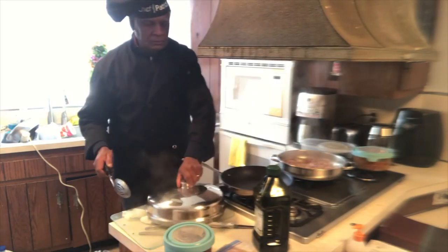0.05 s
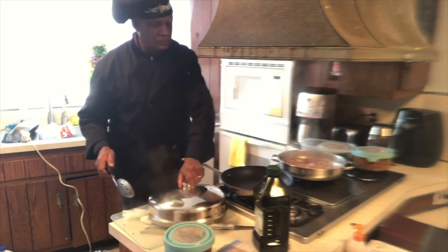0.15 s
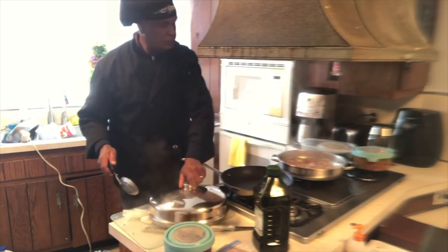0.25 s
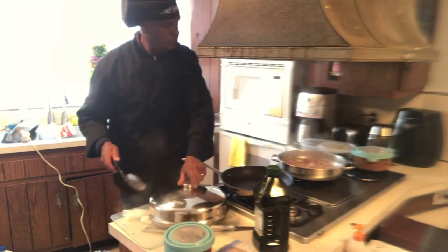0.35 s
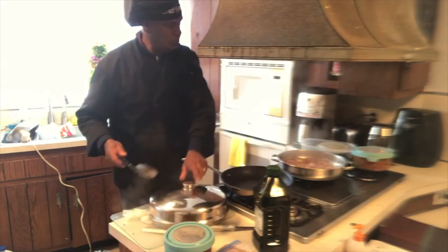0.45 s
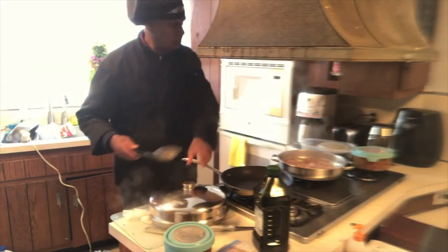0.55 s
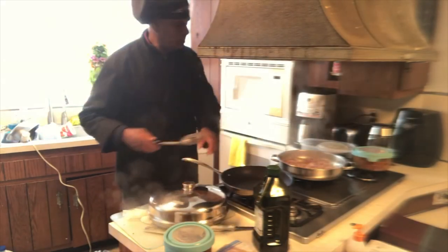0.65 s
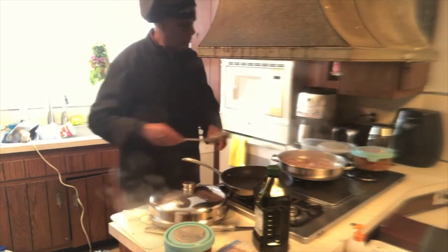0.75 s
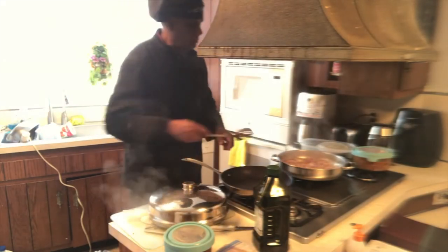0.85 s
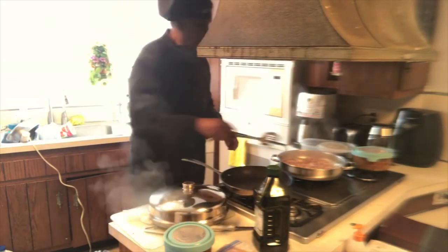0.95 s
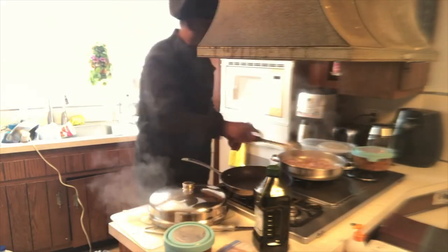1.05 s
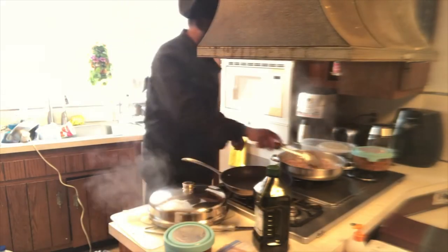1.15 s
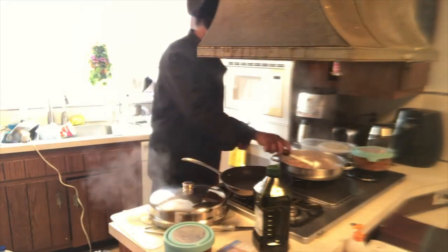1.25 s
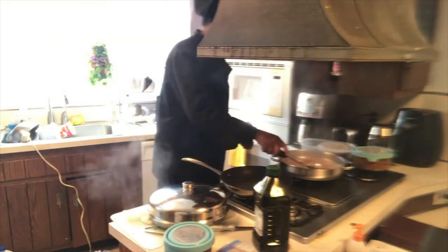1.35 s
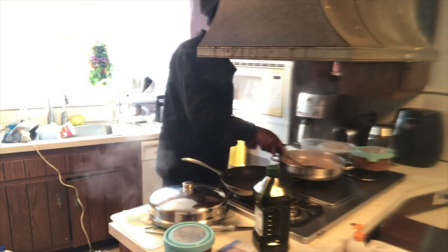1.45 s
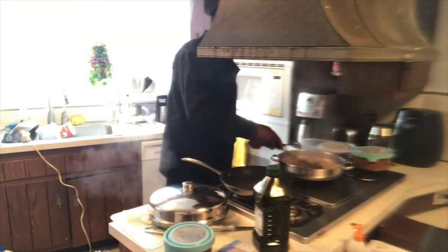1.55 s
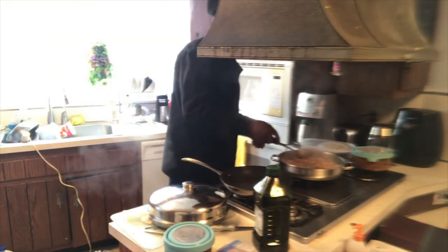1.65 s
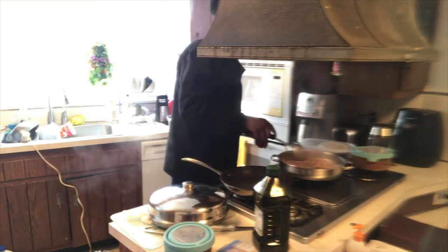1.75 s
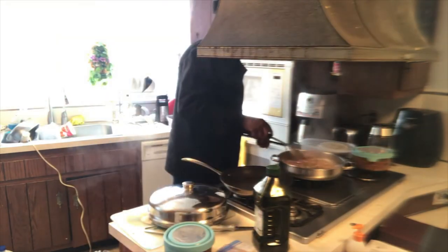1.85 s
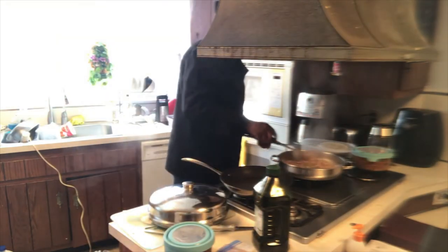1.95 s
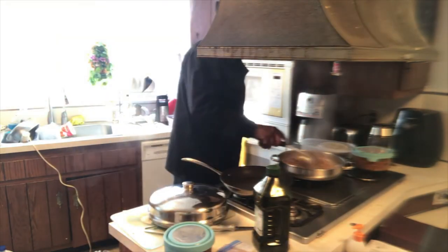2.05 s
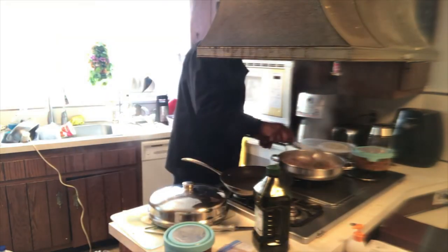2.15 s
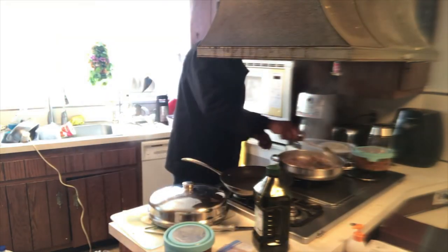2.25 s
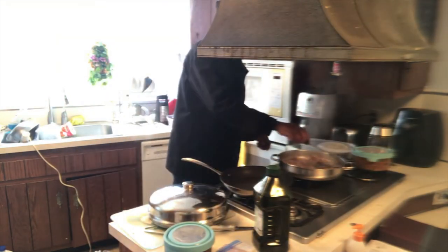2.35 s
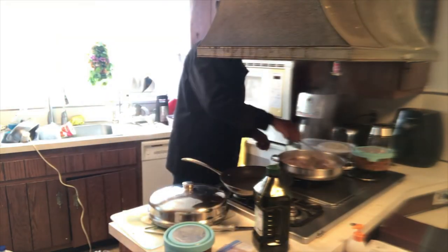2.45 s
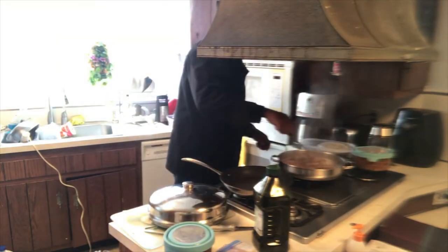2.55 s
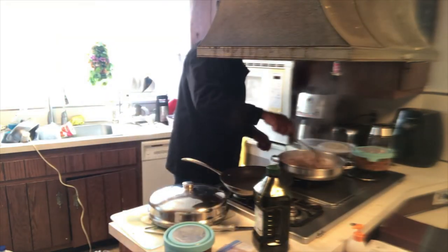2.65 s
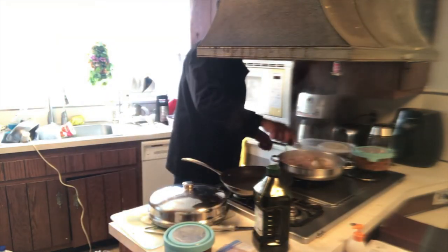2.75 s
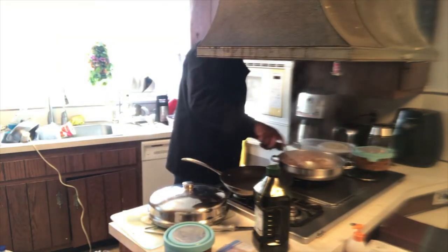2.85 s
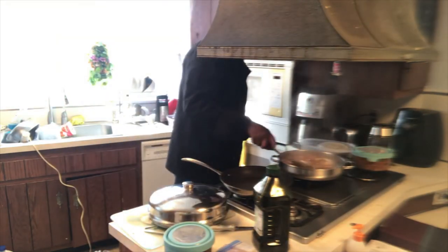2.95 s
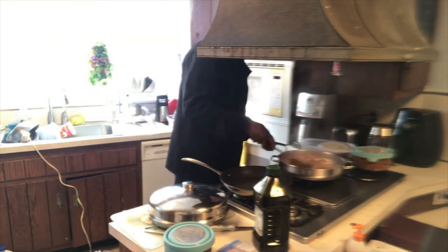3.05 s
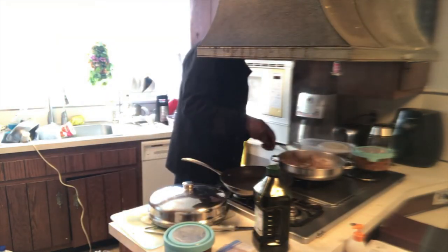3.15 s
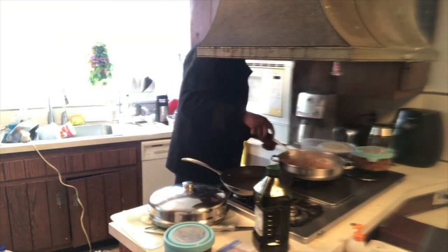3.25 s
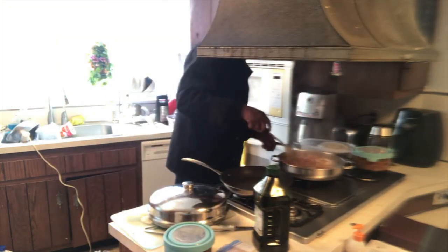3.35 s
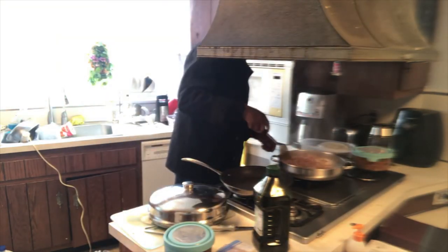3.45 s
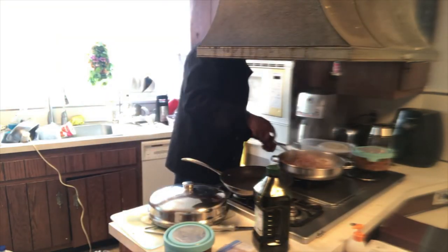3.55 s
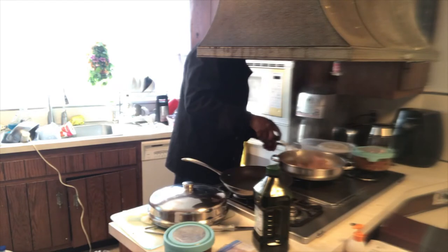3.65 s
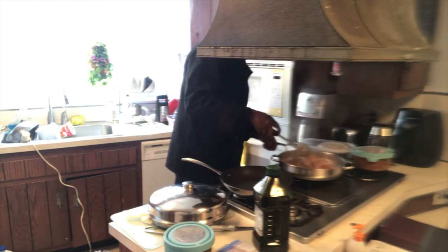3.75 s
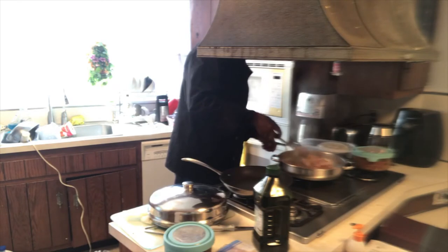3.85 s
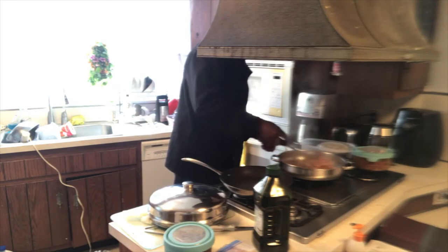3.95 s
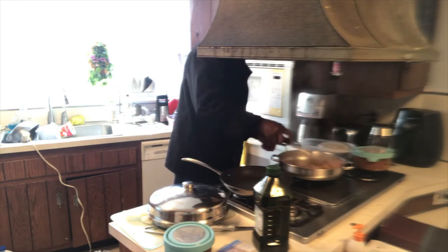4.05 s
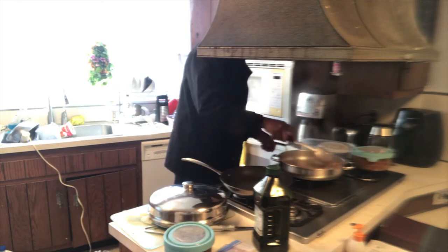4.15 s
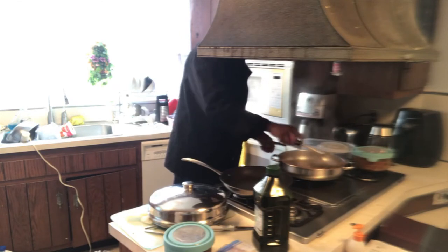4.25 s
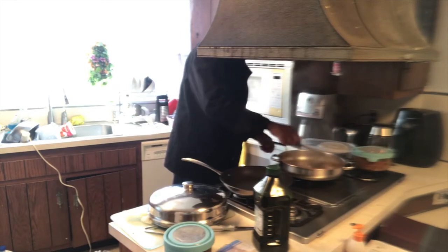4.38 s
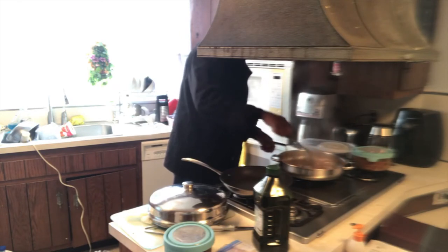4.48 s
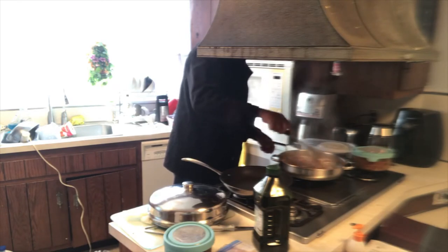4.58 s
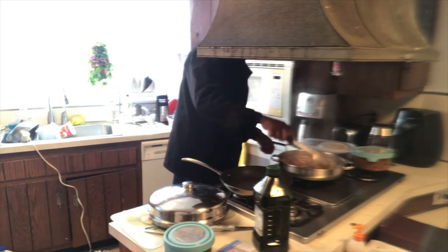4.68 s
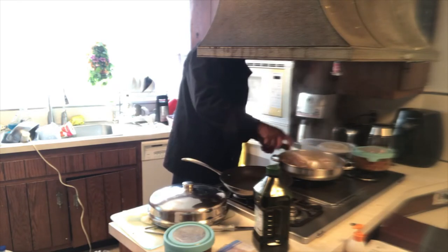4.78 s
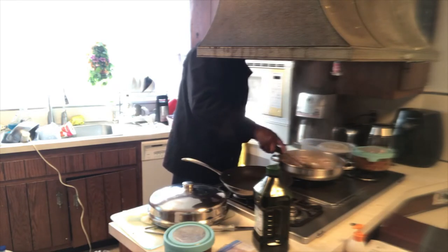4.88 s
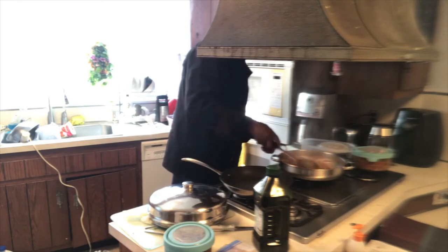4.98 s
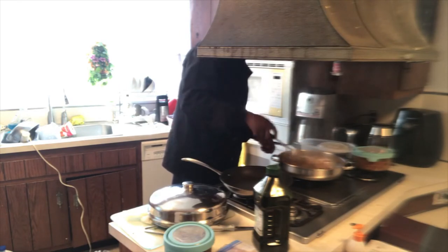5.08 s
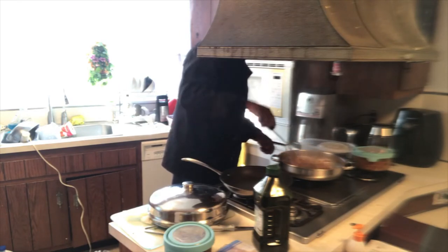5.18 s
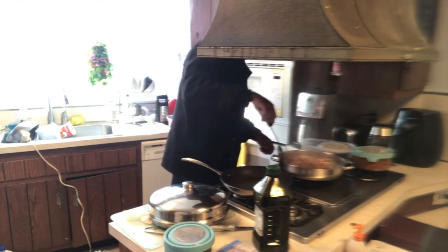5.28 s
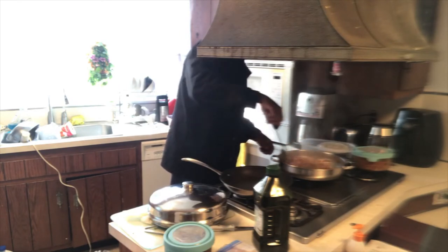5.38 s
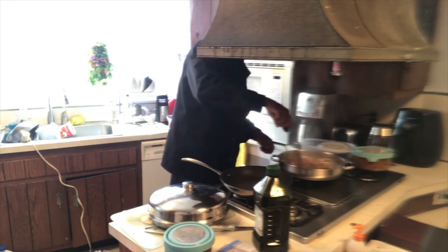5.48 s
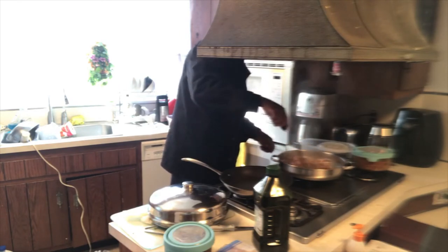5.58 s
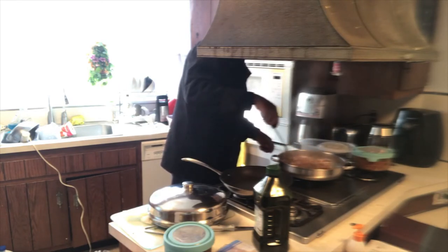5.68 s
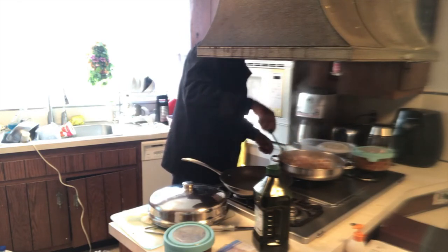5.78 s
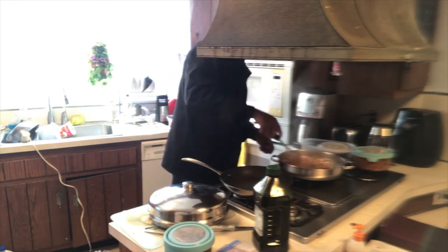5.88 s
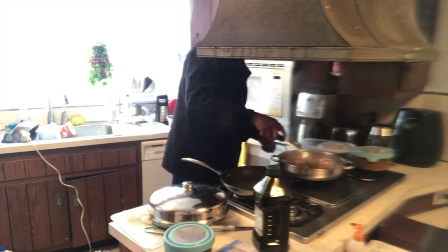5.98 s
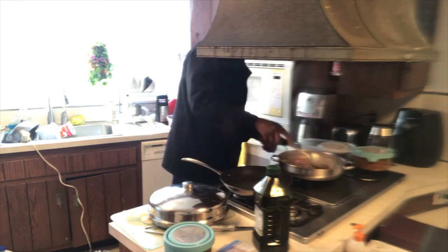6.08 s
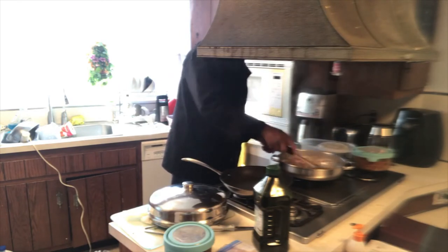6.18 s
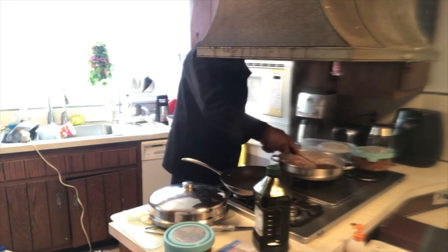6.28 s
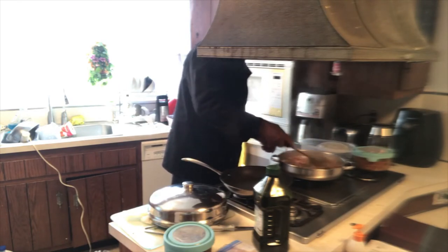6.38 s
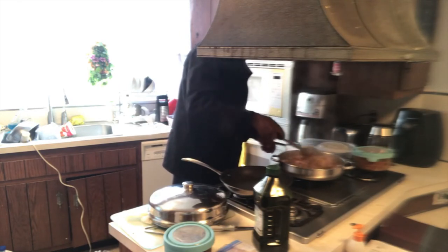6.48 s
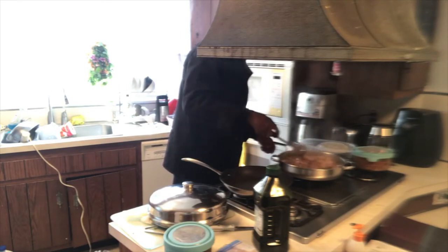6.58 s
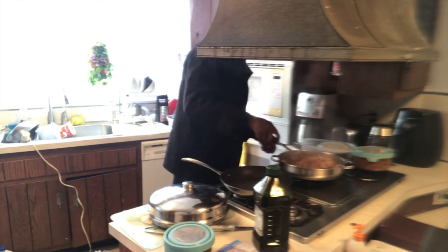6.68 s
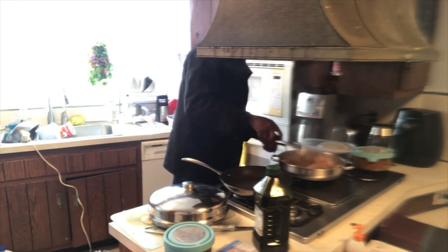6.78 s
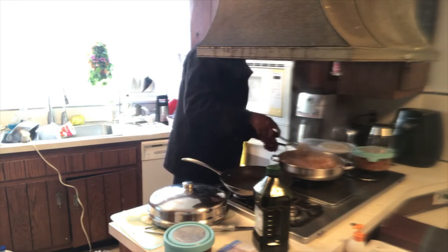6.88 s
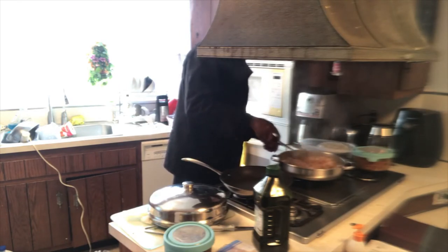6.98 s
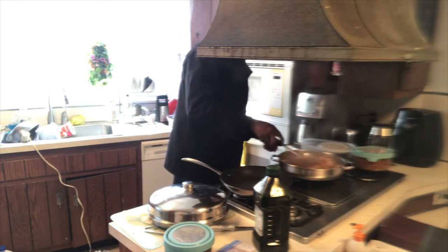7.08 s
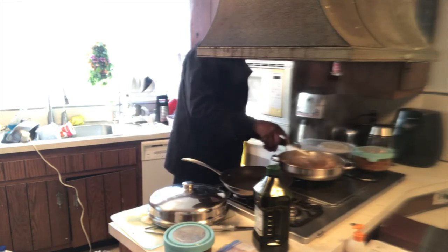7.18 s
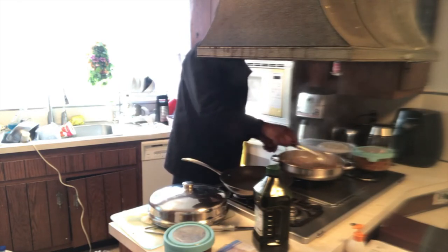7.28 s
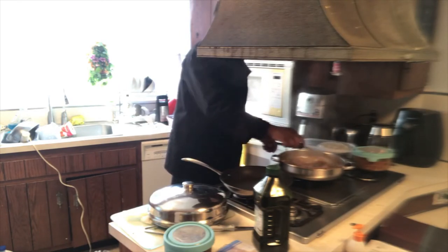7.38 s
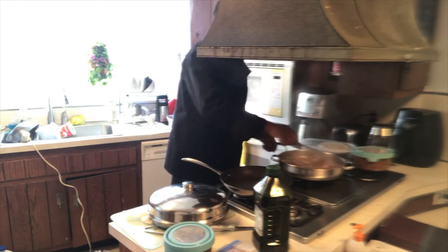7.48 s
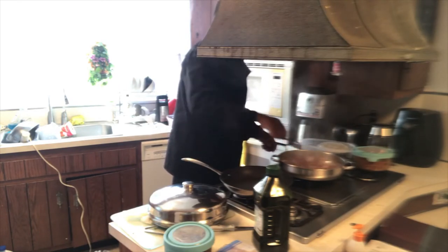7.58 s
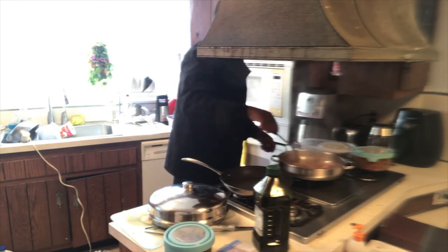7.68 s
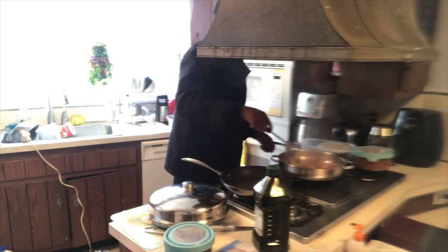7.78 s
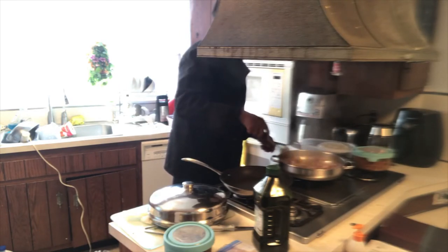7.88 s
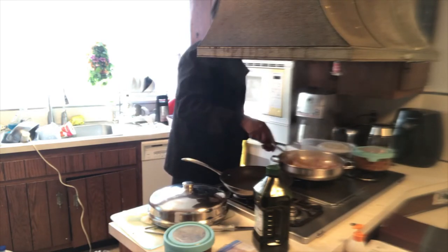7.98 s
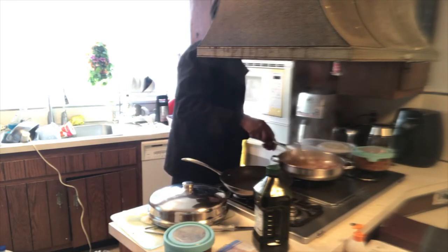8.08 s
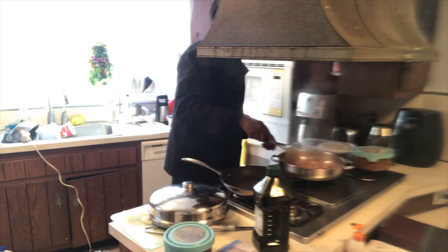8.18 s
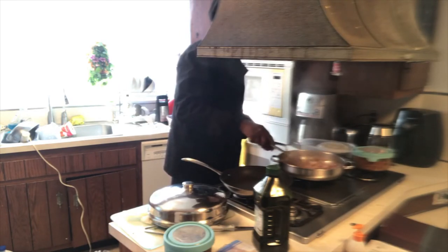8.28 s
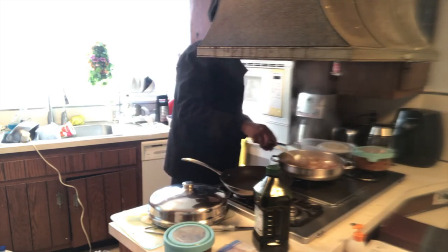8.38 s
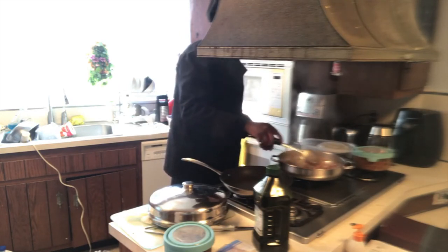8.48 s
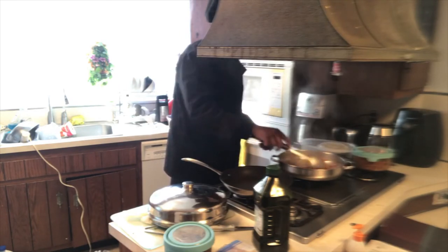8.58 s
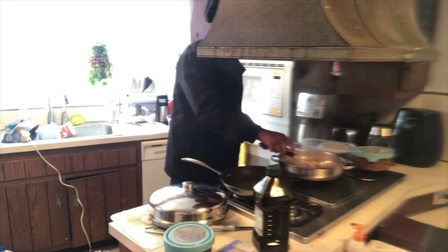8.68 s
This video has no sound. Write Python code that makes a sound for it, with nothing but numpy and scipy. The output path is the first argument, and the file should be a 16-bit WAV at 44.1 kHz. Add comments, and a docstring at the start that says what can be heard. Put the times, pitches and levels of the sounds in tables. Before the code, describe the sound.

Loud lid clatter opens, with a brief beating metallic ring, then a quiet bright scrape. After a second of light frying, a spoon knocks the pan, skids hollowly, clinks sharply several times and gives a short falling squeak. Frying hisses throughout, fuller in the second half, swelling with each scrape. Mono-like pickup in a small reflective kitchen with weak appliance hum.

```python
"""Spoon and lid over a frying pan

A steel lid rattles down onto a pot and scrapes into its seat; then a metal spoon knocks, skids and squeaks on a pan.
Each contact is a noise crack plus decaying modes in beating pairs, with dense reflections of a small hard kitchen.
The frying is random impulses coloured as sizzle, spray and pan resonance; spoon strokes scrape and make it flare.
Behind it lie low room noise and a wavering hum of three sines.
"""
import sys
import numpy as np
from scipy import signal
from scipy.fft import rfft, irfft, next_fast_len
from scipy.io import wavfile
from scipy.ndimage import uniform_filter1d

SR = 44100
rng = np.random.default_rng(int(sys.argv[2]) if len(sys.argv) > 2 else 0)


def waveform_to_disk(signal):
    """Save audio, clipped to [-1, 1], as 16-bit WAV at the path in sys.argv[1]."""
    frames = np.transpose(np.atleast_2d(signal))
    scaled = np.clip(frames, -1, 1) * 32767
    samples = np.round(scaled).astype(np.int16)
    wavfile.write(sys.argv[1], SR, samples)


N = 384993


def amp(db):
    """Decibels to gain."""
    return np.exp(np.asarray(db) * (np.log(10) / 20))


def unit(x):
    """Scales to rms 1."""
    return x / np.sqrt(np.mean(x ** 2) + 1e-20)


def read(points, hz):
    """Reads a table along a log-frequency axis."""
    f, value = np.transpose(points)
    return np.interp(np.log(hz + 1), np.log(f), value)


def colour(x, gain_at):
    """Filters by a gain given as a function of frequency."""
    size = next_fast_len(len(x) + 2048)
    gain = gain_at(np.fft.rfftfreq(size, 1 / SR))
    return irfft(rfft(x, size) * gain, size)[:len(x)]


def shaped(x, spectrum):
    """Filters x by a gain table in dB, then scales to rms 1."""
    return unit(colour(x, lambda hz: amp(read(spectrum, hz))))


def drift(width_hz):
    """Random wander of rms 1: noise under a Gaussian low-pass."""
    return unit(colour(rng.standard_normal(N), lambda hz: np.exp(-(hz / width_hz) ** 2)))


def swell(middle_s, length_s):
    """A smooth rise and fall, 1 at its middle."""
    phase = np.clip((np.arange(N) / SR - middle_s) / length_s, -.5, .5)
    return np.cos(np.pi * phase) ** 2


def add(mix, start_s, sound):
    """Mixes a sound in at its start time."""
    part = mix[max(round(start_s * SR), 0):][:len(sound)]
    part += sound[:len(part)]


# Spoon knocks on the pan. Each row: start in seconds, clang, thud, clink and tick in dB before the spoon gain,
# rebound in dB against the first contact, ring t60 of favoured modes in seconds at 1 kHz, then those modes in Hz.
SPOON_KNOCKS = [(1.169, -39.5, -47.5, -42, -42, -18, .17, 1130, 1453, 2094, 6401, 8834),
                (1.215, -38, -47.5, -41, -50, -18, .45, 1134, 2455, 3359, 4727),
                (2.278, -46, -70, -50, -54, -18, .2, 1200, 1290),
                (2.7313, -32, -53, -29.5, -39.5, -12, .27, 1470, 1572, 2330, 2514, 2750, 3623, 4190, 4274, 4716, 4840),
                (3.4035, -30.5, -47, -28, -29.5, -13, .31, 718, 1260, 2099, 2945, 3440, 3661, 3978, 4610, 5346, 6433),
                (5.240, -30.5, -51, -29.5, -29, -6.5, .28, 640, 730, 1230, 1460, 1545, 2035, 3585, 4640, 5500, 6417),
                (5.7024, -32.5, -53, -31.5, -34, -6, .22, 711, 915, 985, 1071, 2330, 3058, 4221, 4400),
                (5.834, -44, -51, -57, -57, -18, .22, 780, 1110),
                (6.110, -38.5, -48, -42, -40, -18, .15, 384, 612, 1040, 4500, 5130),
                (7.789, -35, -49.5, -31.5, -33, -20, .35, 730, 2085, 3355, 4221, 4651, 5303, 6150),
                (7.835, -43, -53, -47, -48, -18, .2, 1150, 2085),
                (7.949, -44, -52, -52, -58, -5.5, .25, 813, 1100, 1537)]
SPOON_REBOUND_S = .021


def spoon():
    """The spoon strikes the pan, rebounding once each time, and skids once."""
    out = np.zeros(N)
    for start_s, clang_db, thud_db, clink_db, tick_db, rebound_db, t60_s, *favoured_hz in SPOON_KNOCKS:
        band_dbs = np.array([clang_db, thud_db, clink_db, tick_db])
        add(out, start_s, pan_contact(band_dbs, t60_s, favoured_hz))
        add(out, start_s + SPOON_REBOUND_S, pan_contact(band_dbs + rebound_db, t60_s, favoured_hz))
    add(out, SKID_START_S, skid())
    return out


# Ring of pan and spoon. Each row: frequency in Hz, relative level in dB.
PAN_MODES = [(228, -12), (296, -4.5), (718, -3), (1075, -4), (1230, -1), (1460, -0.5), (2095, -3),
             (2455, -8), (3070, -7), (3355, -2.5), (4210, -4), (4580, -1), (5330, -3), (6430, -4)]
# Crack of a bare steel contact. Each row: frequency in Hz, relative gain in dB.
PAN_CRACK = [(120, -14), (200, -3), (520, -8), (660, 2), (1450, 1), (2600, -5), (3700, -1), (6400, -6),
             (7300, -15), (9500, -20), (16000, -11)]
PAN_T60_1KHZ_S, PAN_DAMPING_POWER = .23, .17
SPOON_CHATTER_S, PAN_RING_DB, PAN_FAVOURED_DB = .0011, -.5, 3
OVERTONE_HZ, OVERTONE_DB = (2284, 12100), -12


def pan_contact(band_dbs, t60_s, favoured_hz, overtones=24):
    """Each spot of the pan rings its favoured modes and random weak high ones over the common set."""
    common = [(hz, db, PAN_T60_1KHZ_S) for hz, db in PAN_MODES if not among(hz, favoured_hz)]
    favoured = [(hz, PAN_FAVOURED_DB, t60_s) for hz in favoured_hz]
    weak = [(hz, OVERTONE_DB, PAN_T60_1KHZ_S) for hz in rng.uniform(*OVERTONE_HZ, overtones)]
    # high modes die sooner
    modes = [(hz, db, ring_s * (1000 / hz) ** PAN_DAMPING_POWER) for hz, db, ring_s in common + favoured + weak]
    return blow(band_dbs, SPOON_CHATTER_S, modes, PAN_CRACK,
                ring_db=PAN_RING_DB, split=.008, wet_db=5.5, echo_db=-10)


# Hollow knock of the skid. Each row: frequency in Hz, relative level in dB.
SKID_MODES = [(750, -4), (937, 1), (1320, -7), (1470, -5)]
SKID_START_S, SKID_CHATTER_S, SKID_T60_S = 2.358, .014, .14
SKID_DB = (-38.5, -65, -48, -53)  # clang, thud, clink, tick, before the spoon gain


def skid():
    """The spoon skids over bare steel: a long contact rings a few low modes, hollow and muffled."""
    modes = [(hz, db, SKID_T60_S) for hz, db in SKID_MODES]
    return blow(SKID_DB, SKID_CHATTER_S, modes, PAN_CRACK, ring_db=1, split=.03, wet_db=8, echo_db=-10)


# Spoon sliding over steel. Each row: middle in seconds, length in seconds, pitch at the middle in Hz, peak in dB.
SQUEAKS = [(5.343, .06, 2050, -48), (5.365, .05, 1510, -46)]
SQUEAK_FALL_HZ_PER_S, SQUEAK_WANDER_HZ = 2000, 25


def squeaks():
    """Stick and slip of the spoon: short, unsteady, falling tones."""
    t = np.arange(N) / SR
    out = 0
    for middle_s, length_s, hz, db in SQUEAKS:
        pitch_hz = hz - SQUEAK_FALL_HZ_PER_S * (t - middle_s) + SQUEAK_WANDER_HZ * drift(150)
        tone = np.sin(2 * np.pi * np.cumsum(pitch_hz) / SR)
        out = out + amp(db) * swell(middle_s, length_s) * tone
    return out


# Landings of the lid's rim. Each row: start in seconds, clang, thud, clink and tick in dB before the lid gain,
# rebound in dB against the first contact, then the favoured modes in Hz.
LID_BLOWS = [(.0, -25.5, -30, -33.5, -38, -15, 826, 1303, 1826, 2128, 2316),
             (.150, -24.3, -40.5, -31.5, -44, -8, 540, 716, 1757, 2081, 5216)]
LID_CHATTER_S, LID_REBOUND_S = .003, .018
ROCK_START_S, ROCK_GAP_S, ROCK_CHATTER_S, ROCK_SPREAD_DB = .051, .017, .004, 2
# Rocking contact: clang, thud, clink, tick in dB, before the spread and the lid gain.
ROCK_DB = (-36, -50.5, -40.5, -53)


def lid(rocks=4):
    """The rim lands, rocks in longer, uneven contacts and lands again; each landing rebounds once."""
    out = np.zeros(N)
    for start_s, clang_db, thud_db, clink_db, tick_db, rebound_db, *favoured_hz in LID_BLOWS:
        band_dbs = np.array([clang_db, thud_db, clink_db, tick_db])
        add(out, start_s, lid_contact(band_dbs, LID_CHATTER_S, favoured_hz))
        add(out, start_s + LID_REBOUND_S, lid_contact(band_dbs + rebound_db, LID_CHATTER_S, favoured_hz))
    for k, chance in enumerate(rng.uniform(-1, 1, rocks)):
        band_dbs = np.array(ROCK_DB) + ROCK_SPREAD_DB * chance
        add(out, ROCK_START_S + k * ROCK_GAP_S, lid_contact(band_dbs, ROCK_CHATTER_S, []))
    return out


# Ring of lid and pot. Each row: frequency in Hz, relative level in dB, t60 in seconds.
LID_MODES = [(296, 0, .3), (345, -5, .25), (470, -4, .2), (540, -3, .2), (716, -4, .3), (826, -3, .38),
             (1020, 1, .3), (1210, -8, .5), (1303, -4, .35), (1405, -6, .4), (1525, -3, .3),
             (1695, -5, .42), (1757, 4, .33), (1826, 4, .26), (1906, 4, .28), (1990, 0, .22),
             (2081, -1, .42), (2128, 2, .34), (2191, -3, .33), (2316, -12, .3), (2665, -4, .36),
             (3085, -3, .22), (3355, -5, .22), (4245, -8, .33), (4470, -8, .18), (5216, -10, .2),
             (6370, -10, .13)]
# Crack of rim on pot. Each row: frequency in Hz, relative gain in dB.
LID_CRACK = [(205, -22), (270, 4), (380, -4), (570, 1), (2000, 1), (2400, -11), (3150, -5.5), (3650, -17),
             (4300, -7), (6400, -16), (16000, -42)]
LID_FAVOURED_DB, LID_RING_DB = 5, 1


def lid_contact(band_dbs, chatter_s, favoured_hz):
    """The rim touches the pot once; the spot brings out some of its modes."""
    modes = [(hz, db + LID_FAVOURED_DB * among(hz, favoured_hz), t60_s) for hz, db, t60_s in LID_MODES]
    return blow(band_dbs, chatter_s, modes, LID_CRACK,
                ring_db=LID_RING_DB, split=.008, wet_db=9.5, echo_db=-14)


# Equal modes of the lid as it seats, in Hz.
SEAT_HZ = (220, 840, 1080, 2105, 4447, 5389, 6944, 12480)
SEAT_START_S, SEAT_CHATTER_S, SEAT_T60_S = .410, .03, .25
SEAT_DB = (-46, -57, -49.5, -54)  # clang, thud, clink, tick


def lid_seats():
    """The lid slides into its seat: one long contact, a soft, bright scrape."""
    out = np.zeros(N)
    modes = [(hz, 0, SEAT_T60_S) for hz in SEAT_HZ]
    scrape = blow(SEAT_DB, SEAT_CHATTER_S, modes, PAN_CRACK, ring_db=-6, split=.003, wet_db=9, echo_db=-10)
    add(out, SEAT_START_S, scrape)
    return out


def among(hz, favoured_hz):
    """Whether a mode lies within 1.5 % of a favoured one."""
    return any(abs(hz / f - 1) < .015 for f in favoured_hz)


# Clang, thud, clink and tick bands, in that order. Each row: lower edge in Hz, upper edge in Hz.
BLOW_BANDS = [(500, 2500), (150, 500), (2500, 7000), (7000, 16000)]
PARTNER_DB = -7


def blow(band_dbs, chatter_s, modes, crack, ring_db, split, wet_db, echo_db):
    """Metal on metal: a decaying noise contact cracks and sets modes (Hz, dB, t60 s) ringing."""
    room = kitchen(wet_db)
    t = np.arange(len(room)) / SR

    def in_room(x):
        """Adds the kitchen's reflections."""
        return signal.fftconvolve(x, room)[:len(t)]

    contact = np.exp(-t / max(chatter_s, 1e-4))
    knock = shaped(in_room(rng.standard_normal(len(t)) * contact), crack)
    # in a round vessel each mode has a weaker partner close by, and the two beat
    mode_hz, mode_db, t60_s = np.transpose(modes)[:, :, None]
    detune, phase, partner_phase = rng.random((len(modes), 3)).T[:, :, None]
    partner_hz = mode_hz * (1 + split * (2 * detune - 1))
    main = np.sin(2 * np.pi * (mode_hz * t + phase))
    partner = np.sin(2 * np.pi * (partner_hz * t + partner_phase))
    pairs = main + amp(PARTNER_DB) * partner
    decay = amp(mode_db - 60 * t / t60_s)
    # the ring builds up during the contact
    ring = unit((decay * pairs).sum(0) * (1 - contact))
    ring_in_room = unit(ring + amp(echo_db) * unit(in_room(ring)))
    sound = knock + amp(ring_db) * ring_in_room
    # each band's loudest 600-sample rms is set to its level
    out = 0
    for (lo, hi), db in zip(BLOW_BANDS, band_dbs):
        band = colour(sound, lambda hz: 1 / (1 + (hz / hi) ** 10) - 1 / (1 + (hz / lo) ** 10))
        peak_rms = np.sqrt(uniform_filter1d(band ** 2, size=600).max())
        out = out + amp(db) * band / peak_rms
    return out


# Decay of the kitchen. Each row: frequency in Hz, t60 in seconds.
KITCHEN_T60 = [(200, 0.65), (600, 0.31), (2000, 0.32), (6000, 0.25), (14000, 0.09)]


def kitchen(wet_db):
    """Impulse response: the direct path plus dense reflections, noise dying band by band."""
    count = 19000
    hz, t, z = signal.stft(rng.standard_normal(count), SR, nperseg=256)
    decay = amp(-60 * t / read(KITCHEN_T60, hz)[:, None])
    tail = signal.istft(z * decay, SR, nperseg=256)[1][:count]
    response = amp(wet_db) * tail / np.linalg.norm(tail)
    response[0] += 1
    return response


# Course of the frying. Each row: time in seconds, sizzle in dB before flares and surges.
HEAT = [(0, -58), (1.15, -59.5), (1.75, -57), (2.4, -53), (3.7, -51.5), (4.7, -52), (6.1, -50), (7.6, -51),
        (8.72, -52.5)]
# Spoon pushing food. Each row: middle in seconds, length in seconds, scrape in dB before grip, sizzle flare in dB.
STROKES = [(1.457, 0.54, -55, 4.5), (2.018, 0.61, -58, 1), (3.03, 0.36, -61, 1.5), (3.92, 0.34, -53.5, 0.5),
           (4.44, 0.31, -52, 3), (5.033, 0.36, -53, 3.2), (5.373, .22, -50.5, 2.5), (5.803, 0.23, -48, 1.5),
           (7.06, .35, -56, 1.3), (7.914, 0.36, -52.5, 3.5)]
# Bursting bubbles. Each row: frequency in Hz, relative gain in dB.
SIZZLE = [(300, -31), (1000, -11.5), (2000, -13), (2700, -7.5), (3050, -2), (3500, -1.5), (4350, -2),
          (4900, -7), (5600, -4.5), (6500, -5), (7400, -10), (9000, -13), (11000, -41)]
# Fine spray. Each row: frequency in Hz, relative gain in dB.
SPRAY = [(5000, -10), (7500, -1), (9300, 5), (10400, 0), (11200, 3), (14000, 0), (16000, -3)]
SIMMER_DB, SPRAY_DB = -1.5, -5  # against heat; against sizzle
SURGE_RMS_DB, GRIP_RMS_DB = .7, .88
# wet food meets hot steel in one puff of spray
SPIT_MIDDLE_S, SPIT_LENGTH_S, SPIT_DB = 1.393, .16, -53


def frying():
    """Bubbles burst and throw fine spray; each stroke scrapes the steel and makes the sizzle flare."""
    heat_db = np.interp(np.arange(N) / SR, *np.transpose(HEAT))
    drag, flare_db = 0, 0
    for middle_s, length_s, scrape_db, rise_db in STROKES:
        speed = swell(middle_s, length_s)
        drag = drag + amp(scrape_db) * speed
        flare_db = flare_db + rise_db * speed
    surge_db = SURGE_RMS_DB * drift(20)
    grip_db = GRIP_RMS_DB * drift(29)
    slips = unit(colour(pops(per_s=2000, spread_db=0.0, wet_db=5), pan_body))
    bursts = shaped(pops(per_s=1800, spread_db=3.0, wet_db=11), SIZZLE)
    spray = shaped(pops(per_s=4000, spread_db=4.0, wet_db=3.5), SPRAY)
    sizzle = amp(heat_db + flare_db + surge_db)
    spit = amp(SPIT_DB) * swell(SPIT_MIDDLE_S, SPIT_LENGTH_S)
    # simmer and scrape share the pan's resonances
    body_level = np.hypot(amp(heat_db + SIMMER_DB), drag) * amp(grip_db)
    spray_level = np.hypot(amp(SPRAY_DB) * sizzle, spit)
    return slips * body_level + bursts * sizzle + spray * spray_level


def pops(per_s, spread_db, wet_db):
    """Random impulses of exponentially spread dB, plus a noise wash following their echo power."""
    size = amp(spread_db * np.minimum(rng.exponential(1, N), 4.5))
    fires = rng.random(N) < per_s / SR
    direct = unit(size * rng.choice([-1, 1], N) * fires)
    echo_power = signal.lfilter([1], [1, -np.exp(-1 / (0.0067 * SR))], direct ** 2)  # 6.7 ms decay
    wash = unit(np.sqrt(echo_power) * rng.standard_normal(N))
    return direct + amp(wet_db) * wash


# Resonances of the loaded pan. Each row: frequency in Hz, width in Hz, relative level in dB.
PAN_BODY = [(642, 63, 4.5), (781, 28, 6), (990, 65, 1.5), (1075, 9.7, 11), (1150, 260, 3.5),
            (1518, 104, 4.5), (1814, 180, 0), (2300, 420, -1), (2732, 22, 8.5)]


def pan_body(hz):
    """Gain of the food-damped pan: resonance powers summed."""
    power = sum(amp(2 * db) / (1 + ((hz - f * f / (hz + 1)) / width_hz) ** 2) for f, width_hz, db in PAN_BODY)
    return np.sqrt(power)


# Motor hum. Each row: frequency in Hz, rms level in dB.
HUM = [(119, -77), (199, -77), (339, -80.5)]
# Room noise. Each row: frequency in Hz, relative gain in dB.
ROOM_NOISE = [(20, -34), (32, -10.5), (55, -2), (100, -2.5), (145, -7), (200, 0.5), (260, -6.5),
              (350, -6.5), (440, -5.5), (600, -11), (1000, -4.5), (3000, -34)]
ROOM_NOISE_RMS_DB, HUM_WANDER_RAD = -65.5, 1.55


def appliances():
    """Low filtered room noise and motor hum: sines of wandering phase."""
    t = np.arange(N) / SR
    hum = 0
    for hz, db in HUM:
        tone = np.sin(2 * np.pi * hz * t + HUM_WANDER_RAD * drift(5.7))
        hum = hum + amp(db) * np.sqrt(2) * tone
    return hum + amp(ROOM_NOISE_RMS_DB) * shaped(rng.standard_normal(N), ROOM_NOISE)


SPOON_GAIN_DB, LID_GAIN_DB = -4.5, -5.5


def scene():
    """Spoon, lid, frying and room, the same in both channels."""
    steel = amp(SPOON_GAIN_DB) * spoon() + squeaks() + amp(LID_GAIN_DB) * lid() + lid_seats()
    mix = steel + frying() + appliances()
    return np.array([mix, mix])


EDGE_HZ = 15900


def record(dry):
    """Band limit: a steep linear-phase low-pass."""
    low_pass = signal.firwin(511, EDGE_HZ, window=("kaiser", 9), fs=SR)
    return signal.oaconvolve(dry, low_pass[None], "same")


dry = scene()
out = record(dry)
waveform_to_disk(out)
```